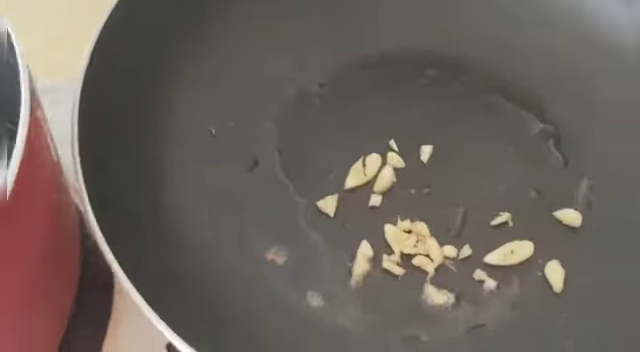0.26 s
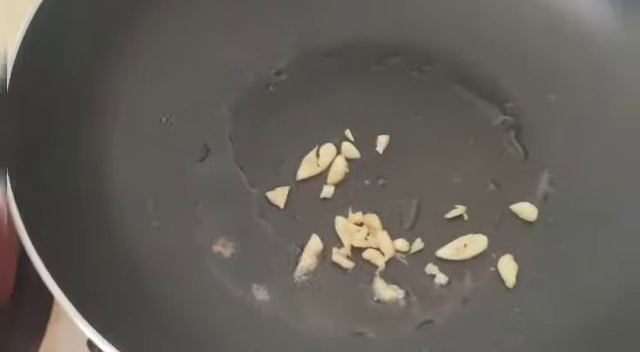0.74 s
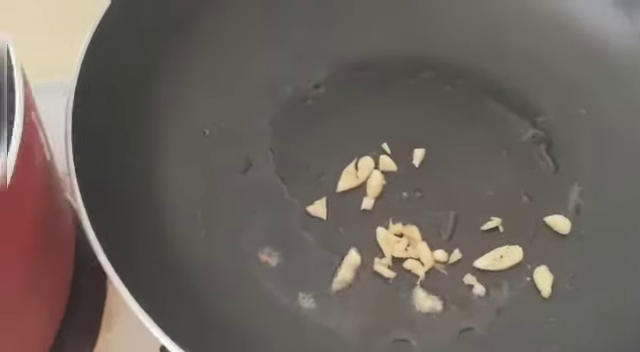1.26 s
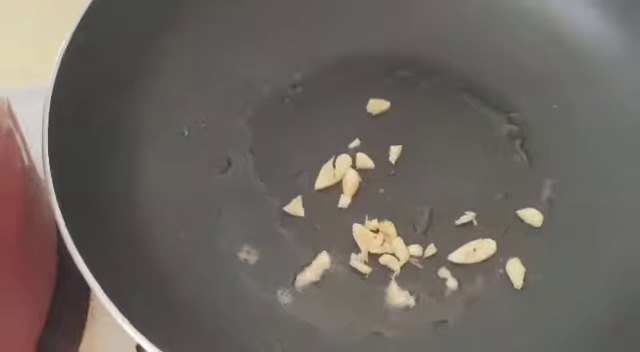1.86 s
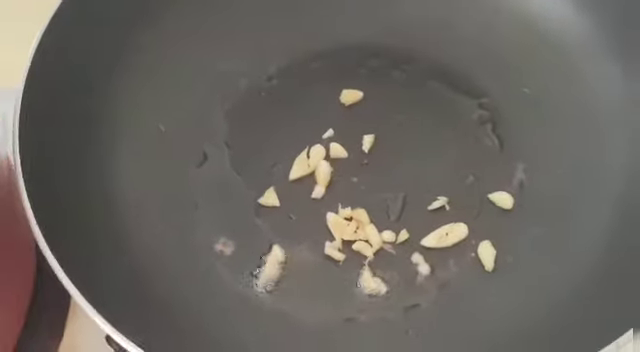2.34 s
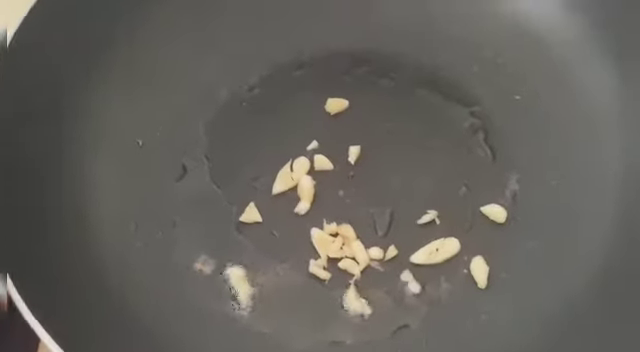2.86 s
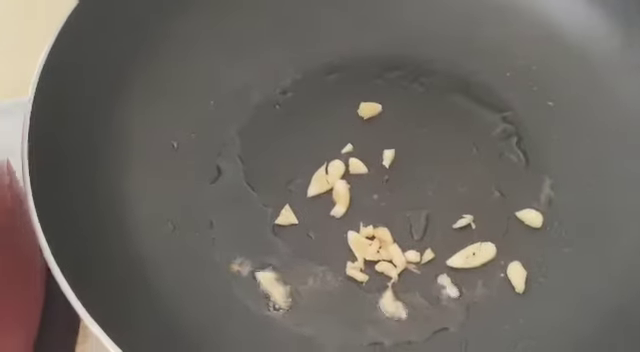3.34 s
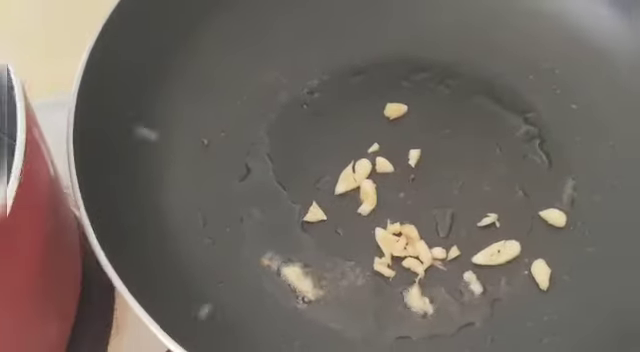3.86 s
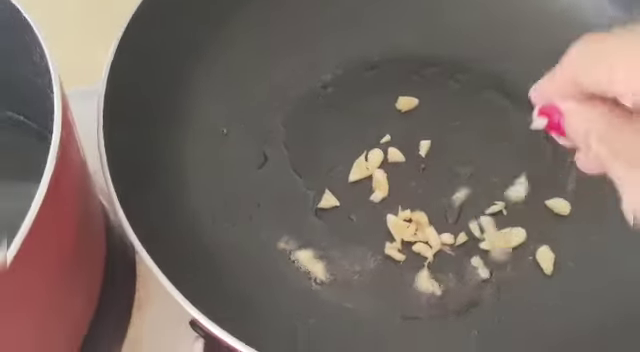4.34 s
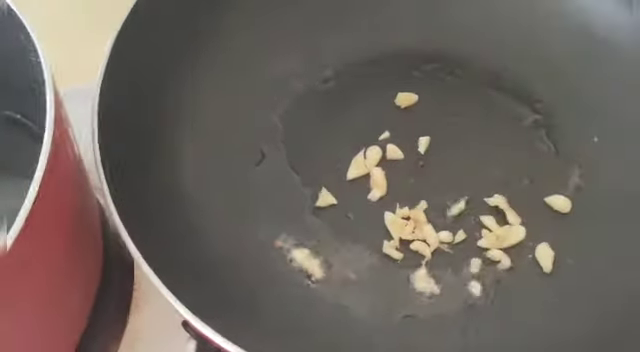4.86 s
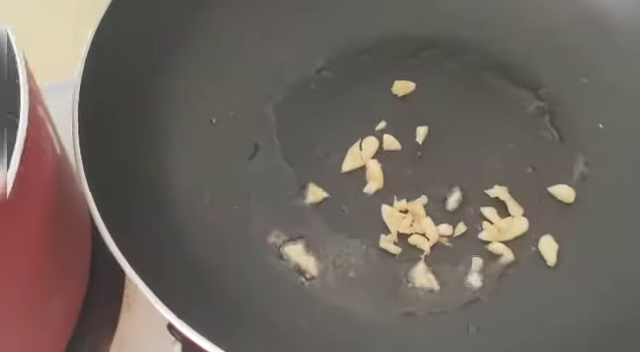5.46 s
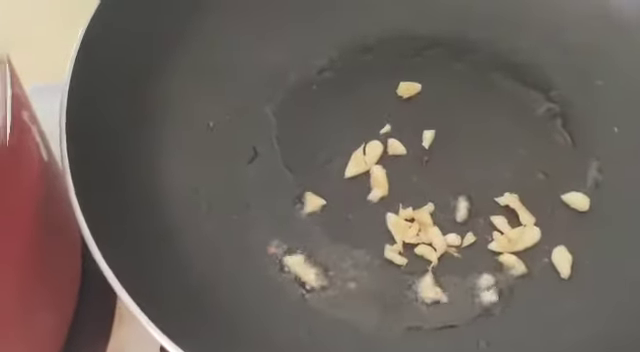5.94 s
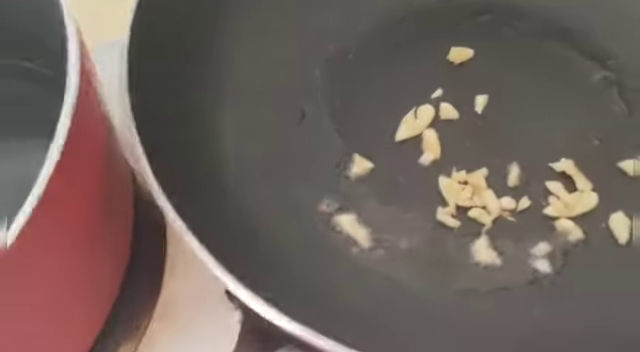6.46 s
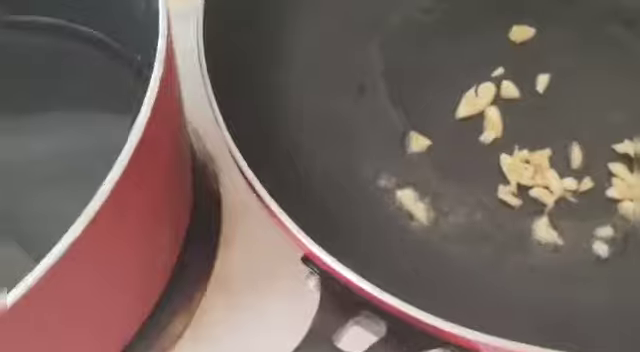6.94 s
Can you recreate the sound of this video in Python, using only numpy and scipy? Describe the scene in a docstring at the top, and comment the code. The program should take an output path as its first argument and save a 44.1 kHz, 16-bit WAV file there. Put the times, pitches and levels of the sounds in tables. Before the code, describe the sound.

Close, bright frying hiss of garlic in hot oil, dotted with crisp pops, sputters and a few tiny soft knocks of landing pieces.

```python
"""Garlic frying in a shallow pan

Chopped garlic fries in a film of oil, heard from close above in a small kitchen. Bright hiss is noise that
swells and fades with the frying; crackle and pops are clicks rung through resonances; larger bubbles are short
rising tones. Wet pieces spit jets of gritty noise, a few bits land with soft knocks. Low noise and wavering
sines are stove and room.
"""
import sys
import numpy as np
from scipy import signal
from scipy.fft import rfft, irfft, next_fast_len
from scipy.io import wavfile
from scipy.ndimage import uniform_filter1d

SR = 44100
rng = np.random.default_rng(int(sys.argv[2]) if len(sys.argv) > 2 else 0)


def pcm_store(signal):
    """Save signal as 16-bit PCM."""
    levels = np.round(np.clip(np.atleast_2d(signal), -1, 1) * 32767)
    wavfile.write(sys.argv[1], SR, levels.astype(np.int16).T)


N = 317079
TIME_S = np.arange(N) / SR

# Stove and room rush. Each row: frequency in Hz, relative spectral level in dB.
RUMBLE_SPECTRUM = [(20, 2.5), (52, -8), (68, 4), (105, 0), (160, -1), (220, -4), (400, -6), (580, -13.5),
                   (730, -4.5), (950, -33), (2000, -14.5), (5000, -48)]
# Appliance hum partials. Each row: frequency in Hz, rms level in dB before the swell.
HUM_PARTIALS = [(71, -70.5), (142.5, -65), (182, -69.5), (212, -77.5), (249, -72.5)]
# Wavering of the hum. Each row: time in seconds, gain in dB.
HUM_SWELL_CURVE = [(0, 1), (.9, 1.5), (1.6, -0.5), (3.0, -1), (3.5, 0), (4.6, 0), (5.5, -3.5), (6.1, 3.5),
                   (7.19, 2)]
# One soft low thump: start in seconds, nominal peak in dB, pitch in Hz, T60 in seconds.
LOW_THUMP = (6.215, -46, 80, 0.3)
# Likeness of the two channels in noise. Each row: frequency in Hz, left-right correlation (no unit).
CHANNEL_LIKENESS = [(30, 0.59), (80, 1), (170, 0.87), (350, 0.72), (700, 0.35), (1400, -0.064),
                    (2800, 0.54), (5000, -0.18), (9000, -0.16), (15000, 0.1)]
# Garlic bits landing. Each row: start in seconds, peak in dB, pitch in Hz, T60 in seconds.
LANDING_KNOCKS = [(1.503, -43, 1700, .006), (1.506, -33, 763, .02), (4.395, -42.5, 777, .025),
                  (4.397, -43, 1250, .018), (4.428, -42.5, 790, .022)]
# Steam jets at set times. Each row: start in seconds, starting rms in dB before the common spit gain,
# pitch in Hz, resonance width in Hz, fade time constant in seconds.
STEAM_JETS = [(.244, -38, 8000, 740, 0.02), (.735, -36, 8160, 740, 0.028), (.745, -48, 5700, 1200, .006),
              (1.755, -35, 5900, 500, .009), (1.868, -36.5, 8300, 1200, .03),
              (2.676, -31.5, 8100, 740, .008), (2.742, -35, 7800, 740, .014),
              (2.778, -29.5, 7000, 740, .0082), (2.832, -30.5, 7140, 740, .017),
              (2.945, -34, 8400, 2500, 0.046), (3.667, -31.5, 8300, 740, 0.017),
              (3.81, -35, 3100, 300, 0.008), (3.821, -38.5, 4300, 700, .004), (3.84, -40.5, 7400, 900, .03),
              (4.027, -34, 9600, 700, .007), (4.162, -42, 7640, 740, .07),
              (4.209, -32.5, 3900, 1000, 0.017), (4.224, -34.5, 4300, 550, 0.032),
              (4.226, -37, 7200, 2600, 0.045), (4.572, -35.5, 5470, 740, 0.014),
              (5.023, -39, 5200, 740, 0.026), (5.306, -35.5, 5500, 740, 0.017),
              (5.448, -33, 7900, 900, .03), (5.455, -27, 8000, 500, 0.0092), (5.699, -39.5, 6050, 500, .01),
              (5.702, -39.5, 4400, 1100, .05), (5.71, -35, 7800, 1700, 0.032),
              (5.7405, -31, 4200, 700, .004), (7.026, -30, 8000, 600, .011),
              (7.027, -38, 4400, 500, 0.0079), (7.028, -39, 5900, 450, 0.018),
              (7.059, -28.5, 6860, 740, .0047), (7.06, -35, 12500, 4500, .01)]
# Bursting drops. Each row: start in seconds, rms over 2 ms in dB, cavity pitch in Hz,
# crack against ring in dB, bottom of the crack in Hz, top of the crack in Hz.
DROP_POPS = [(.2433, -30, 7950, -13, 3000, 12000), (1.8648, -26, 8000, -1, 2230, 9000),
             (1.8725, -33, 7700, -13, 3000, 12000), (2.492, -35, 3230, 17, 1000, 9000),
             (3.0577, -24, 9100, -12, 3500, 14000), (3.3252, -26, 7400, -28, 3000, 12000),
             (3.8106, -22, 2980, 3, 1400, 5000), (3.812, -29, 7340, 5, 4000, 15000),
             (4.1508, -26, 13000, 8, 6000, 15000), (4.202, -28, 7800, -10, 4500, 14000),
             (4.2274, -28.5, 4100, -9, 2500, 9000), (4.2298, -32, 4220, -20, 3000, 9000),
             (4.247, -42, 4300, -16, 3000, 9000), (4.4093, -31.5, 12600, 11, 1200, 14000),
             (5.1444, -19.5, 7860, -10, 2600, 14000), (5.4027, -21.5, 6920, -40, 3000, 12000),
             (5.5593, -29, 7500, -16, 4000, 12000), (5.692, -21, 7400, -10, 3300, 5000),
             (5.7327, -29, 6900, -8, 4000, 10000), (5.948, -32.5, 3720, 2, 1500, 9000),
             (6.2218, -25.5, 7800, 0, 2200, 15500), (6.9973, -18.5, 7750, 9, 1300, 15500),
             (7.026, -37, 2700, 6, 1500, 8000)]
# Frying strength. Each row: time in seconds, then relative levels in dB of the sizzle,
# the finest spray and the coarse bubbling.
FRYING_CURVE = [(0.0, -40, -38, -46), (0.4, -40, -41, -46.5), (0.92, -40, -38.5, -48.5),
                (1.2, -41, -40.5, -48.5), (1.6, -41, -42.5, -48.5), (1.88, -41, -42, -48),
                (2.25, -42, -40.5, -50), (2.66, -40, -43, -50), (2.86, -39, -43.5, -52),
                (3.04, -40, -43.5, -49.5), (3.38, -42, -40.5, -51), (3.62, -44, -44, -50),
                (4.27, -44, -47, -50), (4.93, -40, -43.5, -47.5), (5.29, -39, -48, -48),
                (6.13, -41, -42, -47), (6.47, -40, -42.5, -48), (7.19, -40, -43, -49)]
# Oil hiss. Each row: frequency in Hz, relative spectral level in dB.
HISS_SPECTRUM = [(300, -17), (900, -14), (1400, -16), (2000, -14), (2600, -16.5), (3200, -13), (5200, -11),
                 (6500, -11), (7200, -4), (8100, 0.14), (9200, -5.5), (11000, -9), (12800, -12),
                 (15200, -6.5)]
# Pan resonances and dips colouring the hiss. Each row: centre in Hz, width in Hz, gain in dB.
PAN_COLOUR = [(2800, 320, 1), (4550, 130, 6), (4740, 180, -5), (5780, 410, 4.5), (6220, 250, 2),
              (6650, 180, 9.5), (6690, 130, -4), (7460, 810, 0.5), (8660, 400, -0.5)]
# Left-right balance of the spray. Each row: time in seconds, left-over-right level in dB.
SPRAY_BALANCE = [(0, -4.5), (.7, -1), (6.1, -1), (6.8, -4)]
# Share of that balance by frequency. Each row: frequency in Hz, factor (no unit).
BALANCE_SHARE = [(3000, 0), (5500, 0.6), (8000, 0.4), (9500, 0), (11500, 2), (13000, -2.5), (14800, 10)]

KITCHEN_T60_S, ROOM_DB = 0.16, -13
CUTOFF_HZ = 15700
SIDE_SPREAD_DB = 10
RANDOM_JETS_PER_S, RANDOM_JET_DB, RANDOM_JET_FADE_S = 2, -38, 0.026  # level before the common spit gain
RANDOM_JET_LOW_HZ, RANDOM_JET_HIGH_HZ, RANDOM_JET_WIDTH_HZ = 6460, 8650, 1000
RING_CYCLES, RING_HALVING_DB = 6.1, 15  # ring to -60 dB at 0 dB crack; crack rise that halves it
FIZZ_DB, FIZZ_WIDTH_HZ, FIZZ_FADE_S = -16, 2600, 0.0093  # level against its pop
BUBBLING_DB = -51.5
BUBBLE_SPREAD_DB, LARGEST_BUBBLE_DB = 4.0, 13.5


def from_db(db):
    """Decibels to amplitude gain."""
    return 10 ** (np.asarray(db) / 20)


def rms_one(x):
    """Scale to unit rms."""
    return x / np.sqrt(np.mean(x ** 2) + 1e-20)


def at_hz(points, hz):
    """Read a table on a log-frequency axis."""
    known_hz, values = np.transpose(points)
    return np.interp(np.log(np.maximum(hz, 1)), np.log(known_hz), values)


def follow(rows, t_s):
    """Columns of a curve at the given times."""
    known_s, *columns = np.transpose(rows)
    return [np.interp(t_s, known_s, column) for column in columns]


def drift(rate_hz, count=1, size=N):
    """Slow random wandering of unit rms, two knots per cycle of the rate, over the whole duration."""
    knots = rng.standard_normal((count, int(2 * rate_hz * N / SR) + 3))
    where = np.linspace(0, knots.shape[1] - 2, size)
    rows = [np.interp(where + rng.random(), np.arange(len(row)), row) for row in knots]
    return rms_one(np.array(rows)).squeeze()


def ring(clicks, hz, t60_s):
    """Two-pole resonator: a unit click starts a decaying sine of initial height about 1."""
    radius = np.exp(-np.log(1000) / (t60_s * SR))
    angle = 2 * np.pi * hz / SR
    poles = [1, -2 * radius * np.cos(angle), radius * radius]
    return signal.lfilter([0, np.sin(angle)], poles, clicks + 1e-18)


def resonance(x, hz, width_hz):
    """Two-pole band-pass with about unit peak gain."""
    radius = np.exp(-np.pi * width_hz / SR)
    zeros = np.array([1, 0, -1]) * (1 - radius * radius) / 2
    poles = [1, -2 * radius * np.cos(2 * np.pi * hz / SR), radius * radius]
    return signal.lfilter(zeros, poles, x + 1e-18)


def balance(db):
    """Left and right gains for a left-over-right level difference."""
    return from_db(np.array([[1], [-1]]) * db / 2)


def add(out, start_s, sound):
    """Mix a sound in at its start time."""
    i = max(int(start_s * SR), 0)
    out[:, i:i + sound.shape[-1]] += sound[..., :N - i]


def stereo_noise(spectrum):
    """Coloured noise of unit rms; mid and side are weighted to give the tabled channel likeness."""
    length = next_fast_len(N, real=True)
    hz = np.arange(length // 2 + 1) * SR / length
    alike = np.clip(at_hz(CHANNEL_LIKENESS, hz), -1, 1)
    mid, side = rfft(rng.standard_normal((2, length)))
    both = np.sqrt(1 + alike) * mid + np.sqrt(1 - alike) * side * [[1], [-1]]
    return rms_one(irfft(both * from_db(at_hz(spectrum, hz)), length)[:, :N])


def from_pan(x, scatter=1.0, fade_s=0.0032, size=300):
    """Sound from one spot: a direct path to each channel, then scatter off the pan's floor and wall."""
    t_s = np.arange(size) / SR
    paths = rng.standard_normal((2, size)) * np.exp(-t_s / fade_s) * (1 - np.exp(-2 * t_s / fade_s))
    paths *= scatter / np.sqrt(np.sum(paths ** 2, axis=1, keepdims=True))
    paths[[0, 1], rng.integers(0, 2, 2)] += 1  # direct path, 0 or 1 sample late
    return signal.oaconvolve(x[None], paths, axes=1)[:, :len(x)]


def kitchen(x, wall_hz=7000, size=16000):
    """Small-room reverberation: decaying diffuse noise, dulled by a low-pass."""
    t_s = np.arange(size) / SR
    decay = np.exp(-np.log(1000) * t_s / KITCHEN_T60_S) * (t_s > 0.004)
    tail = rng.standard_normal((2, size)) * decay
    tail = signal.sosfilt(signal.butter(1, min(wall_hz, CUTOFF_HZ), fs=SR, output="sos"), tail)
    return signal.oaconvolve(x, tail / np.sqrt(np.sum(tail ** 2) / 2), axes=1)[:, :N]


def background(rumble_db=-54.0, waver_rad=0.7):
    """Stove and room: low noise, phase-wavering hum sines and one soft ringing thump."""
    hum = 0
    for hz, db in HUM_PARTIALS:
        phase_rad = 2 * np.pi * hz * TIME_S + waver_rad * drift(3.7)
        hum = hum + from_db(db) * np.sqrt(2) * np.sin(phase_rad)
    swell_db = follow(HUM_SWELL_CURVE, TIME_S)[0]
    out = from_db(rumble_db) * stereo_noise(RUMBLE_SPECTRUM) + hum * from_db(swell_db)
    start_s, db, hz, t60_s = LOW_THUMP
    add(out, start_s, from_db(db) * ring(signal.unit_impulse(SR), hz, t60_s))
    return out


def landings(size=5000):
    """A soft piece drops on oiled metal: a dull, damped mode rings."""
    out = np.zeros((2, N))
    for start_s, db, hz, t60_s in LANDING_KNOCKS:
        knock = resonance(ring(signal.unit_impulse(size), hz, t60_s), hz, 350)
        add(out, start_s, from_db(db) * knock / np.max(abs(knock)))
    return out


def jet(hz, width_hz, fade_s, rise_s=0.0051, size=8000):
    """Steam sputters through oil: gritty, stuttering noise of unit rms in a resonance, then shaped to fade."""
    t_s = np.arange(size) / SR
    grit_db, stutter_db, stutter_s = 6.0, 2.8, 0.002
    gulps_s = np.arange(0, size / SR, stutter_s)
    stutter = np.interp(t_s, gulps_s, rng.standard_normal(len(gulps_s)))
    level_db = grit_db * rng.standard_normal(size) + stutter_db * stutter
    sputter = rng.standard_normal(size) * from_db(level_db)
    steam = resonance(resonance(sputter, hz, width_hz), hz, 2 * width_hz)
    shape = (1 - np.exp(-t_s / rise_s)) * np.exp(-t_s / fade_s)
    return rms_one(from_pan(steam, scatter=0.74)) * shape / shape.max()


def spits():
    """Wet pieces let off steam: jets at set times, and a few more at random times and sides."""
    out = np.zeros((2, N))
    for start_s, db, hz, width_hz, fade_s in STEAM_JETS:
        add(out, start_s, from_db(db) * jet(hz, width_hz, fade_s))
    for when, pitch, side in rng.random((int(RANDOM_JETS_PER_S * N / SR), 3)):
        hz = RANDOM_JET_LOW_HZ + pitch * (RANDOM_JET_HIGH_HZ - RANDOM_JET_LOW_HZ)
        gains = from_db(RANDOM_JET_DB) * balance(SIDE_SPREAD_DB * (2 * side - 1))
        add(out, when * N / SR, gains * jet(hz, RANDOM_JET_WIDTH_HZ, RANDOM_JET_FADE_S))
    return out


def pops(size=2000):
    """A drop flashes to steam: a sharp crack, the short ring of the cavity it leaves, a brief fizz."""
    out, click = np.zeros((2, N)), signal.unit_impulse(size)
    in_two_ms = np.sqrt(0.002 * SR / size)  # refers the rms to 2 ms
    for start_s, db, hz, crack_db, bottom_hz, top_hz in DROP_POPS:
        band_hz = [bottom_hz, min(top_hz, CUTOFF_HZ)]
        crack = signal.sosfilt(signal.butter(2, band_hz, "band", fs=SR, output="sos"), click)
        t60_s = RING_CYCLES / hz * 2 ** (-crack_db / RING_HALVING_DB)
        cavity = resonance(click, hz, np.log(1000) / (np.pi * t60_s))
        cavity = resonance(cavity, hz, hz / 2)
        burst = rms_one(cavity) + from_db(crack_db) * rms_one(crack)
        burst = from_pan(burst, scatter=0.95, fade_s=0.0011)
        add(out, start_s, from_db(db) * rms_one(burst) * in_two_ms)
        add(out, start_s, from_db(db + FIZZ_DB) * jet(hz, FIZZ_WIDTH_HZ, FIZZ_FADE_S))
    return out


def bubbling(per_s=520, low_hz=2900, high_hz=7000, cycles=90, rise_per_s=2.3, swell_s=0.00042, size=1600):
    """Larger bubbles at the edges of the pieces: each sings briefly, rising in pitch as it surfaces."""
    out, t_s = np.zeros((2, N)), np.arange(size) / SR
    spread_db = 8
    for when, pitch, big, side, lag in rng.random((int(per_s * N / SR), 5)):
        hz = low_hz + pitch * (high_hz - low_hz)
        shape = (1 - np.exp(-t_s / swell_s)) * np.exp(-np.log(1000) * t_s * hz / cycles)
        lag_rad = np.array([[0], [2 * np.pi * (lag - 0.5)]])  # right against left
        phase_rad = 2 * np.pi * hz * t_s * (1 + rise_per_s * t_s / 2) + lag_rad
        gains = from_db(spread_db * big) * balance(SIDE_SPREAD_DB * (side - 0.5)) * hz / low_hz
        add(out, when * N / SR, gains * shape * np.sin(phase_rad))
    sizzle_db, _, coarse_db = follow(FRYING_CURVE, TIME_S)
    return rms_one(out * from_db(coarse_db + sizzle_db / 2))


def crackle(per_s=1800, clump_db=3.5, width_hz=2000, bright_db=0.5, count=14):
    """Single bubbles burst in clumps, denser when frying is harder; each click rings a short resonance."""
    t_s = np.arange(0, N / SR, 0.001)
    out, busy_db = 0, 2 * follow(FRYING_CURVE, t_s)[0]
    mean_balance_db = np.mean(SPRAY_BALANCE, axis=0)[1]
    for hz in np.linspace(2400, 15200, count):
        chance = np.cumsum(from_db(busy_db + clump_db * drift(25, size=len(t_s))))
        when, big, sign = rng.random((int(per_s * N / SR / count), 3)).T
        at = np.interp(when, chance / chance[-1], t_s * SR).astype(int)
        size_db = np.minimum(-BUBBLE_SPREAD_DB * np.log(1 - big), LARGEST_BUBBLE_DB)
        clicks = np.zeros(N)
        clicks[at] = from_db(size_db) * np.sign(sign - 0.5)
        bubbles = from_pan(rms_one(resonance(clicks, hz, width_hz)), scatter=1.0, fade_s=0.0029)
        colour_db = at_hz(HISS_SPECTRUM, hz) + bright_db * (hz > 10000)  # smallest snap hardest
        out = out + bubbles * from_db(colour_db) * balance(at_hz(BALANCE_SHARE, hz) * mean_balance_db)
    return rms_one(out)


def hiss(uneven_db=18.0, ceiling=0.53, surge_db=0.62, uneven_hz=9, size=1024, count=3):
    """Oil hiss: bright noise that swells and fades with the frying."""
    hz, t_s, bins = signal.stft(stereo_noise(HISS_SPECTRUM), SR, nperseg=size)
    sizzle_db, spray_db, coarse_db = [db - np.mean(db) for db in follow(FRYING_CURVE, t_s)]
    coarse = np.interp(hz, [4500, 6500], [1, 0])[:, None]
    fine = np.interp(hz, [8500, 12000], [0, 1])[:, None]
    treble = np.interp(hz, [1000, 4500], [0.3, 1])[:, None]
    level_db = (1 - fine - coarse) * sizzle_db + fine * spray_db + coarse * treble * coarse_db
    for centre_hz, width_hz, db in PAN_COLOUR:
        level_db = level_db + db / (1 + (2 * (hz[:, None] - centre_hz) / width_hz) ** 2)

    # uneven level; the ceiling limits swells
    wander = drift(uneven_hz, count=len(hz), size=len(t_s))
    wander = rms_one(uniform_filter1d(wander, size=count, axis=0))
    uneven = from_db(uneven_db * np.minimum(wander, ceiling) * treble)
    uneven = uneven / np.sqrt(np.mean(uneven ** 2, axis=1, keepdims=True))
    level = uneven * from_db(level_db + surge_db * drift(9, size=len(t_s)))

    # left-right balance at constant total power
    side_db = at_hz(BALANCE_SHARE, hz)[:, None] * follow(SPRAY_BALANCE, t_s)[0]
    mean_power = (from_db(side_db) + from_db(-side_db)) / 2
    sides = from_db([side_db / 2, -side_db / 2]) / np.sqrt(mean_power)
    return signal.istft(bins * level * sides, SR, nperseg=size)[1][:, :N]


def scene(hiss_db=-33.5, crackle_db=-43.5, pop_db=0.0, spit_db=-2.5):
    """The pan close by; the kitchen reverberates its crackle, pops, spits and landings."""
    bursts = from_db(crackle_db) * crackle() + from_db(pop_db) * pops()
    bursts = bursts + from_db(spit_db) * spits() + landings()
    sizzle = from_db(hiss_db) * hiss() + from_db(BUBBLING_DB) * bubbling()
    return sizzle + bursts + from_db(ROOM_DB) * kitchen(bursts) + background()


def record(dry):
    """Steep elliptic low-pass: the top is cut."""
    return signal.sosfilt(signal.ellip(12, 0.1, 80, CUTOFF_HZ, fs=SR, output="sos"), dry)


dry = scene()
out = record(dry)
pcm_store(out)
```